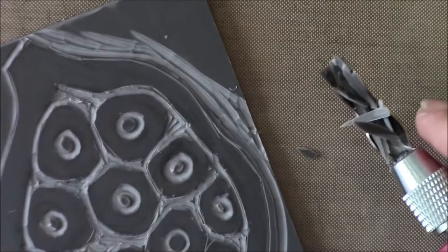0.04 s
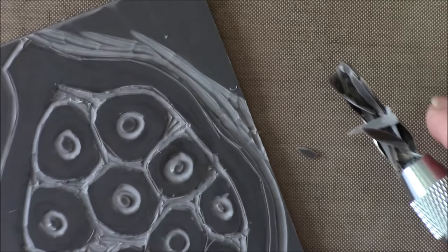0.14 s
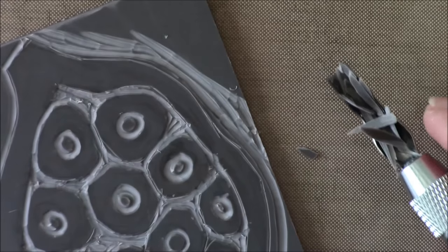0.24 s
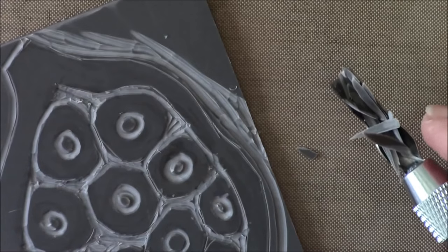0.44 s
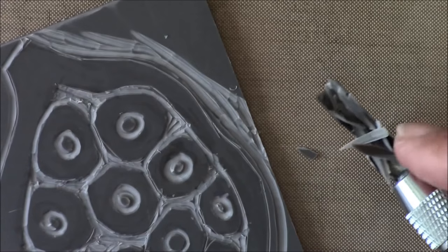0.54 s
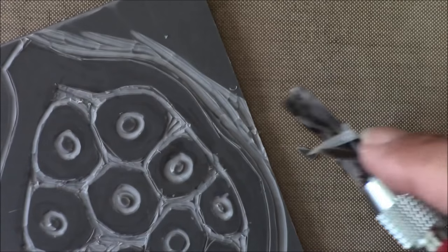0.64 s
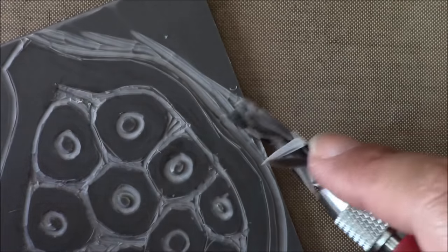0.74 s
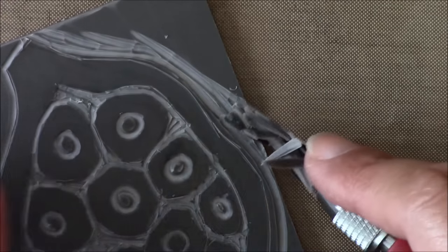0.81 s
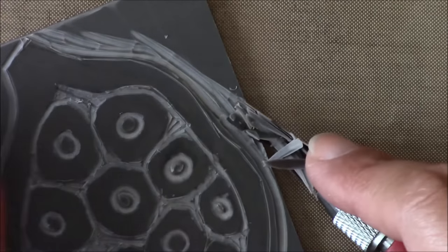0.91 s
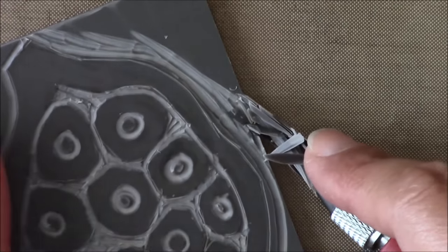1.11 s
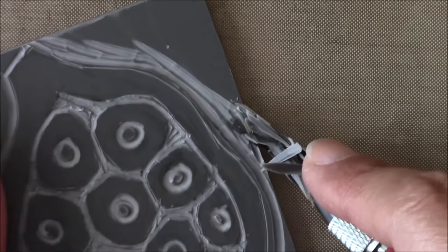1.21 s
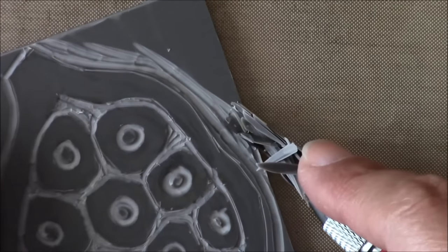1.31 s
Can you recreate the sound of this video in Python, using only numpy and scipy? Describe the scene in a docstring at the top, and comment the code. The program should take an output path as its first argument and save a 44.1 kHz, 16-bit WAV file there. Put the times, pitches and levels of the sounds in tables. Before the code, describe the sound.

A metal carving tool is handled close by in a small quiet room. It rubs and scrapes briefly, clicks sharply three times as it knocks on a block, then ticks and slides softly.

```python
"""A small quiet room, close by: a metal carving tool is turned in the fingers and set against a block.
It rubs and ticks lightly, scrapes once, then clicks sharply three times as it knocks on the block.
Small ticks and a soft slide follow, over faint room noise with a low hum.
Contacts are noise bursts plus damped modes of tool and block, each with a short room wash;
friction is grainy noise through resonances."""
import sys
import numpy as np
from scipy import signal
from scipy.fft import rfft, irfft, next_fast_len
from scipy.io import wavfile
from scipy.ndimage import map_coordinates

SR = 44100
rng = np.random.default_rng(int(sys.argv[2]) if len(sys.argv) > 2 else 0)


def wrap_up_sound(samples):
    """Save the sound to the file named by the first command line argument, as 16-bit audio."""
    columns = np.atleast_2d(samples).T
    # keep every value between -1 and 1, then stretch to whole-number steps
    tamed = np.clip(columns, -1, 1)
    steps = np.round(tamed * 32767).astype(np.int16)
    wavfile.write(sys.argv[1], SR, steps)


N = 59535

# stereo width of washes and rubbing: freq_hz, side_over_mid_db
ROOM_WIDTH = [(300, -28), (1000, -38), (2500, -44), (4500, -31), (8000, -15), (14000, -16.5)]


def amp(db):
    """Decibels to gain."""
    return 10 ** (np.asarray(db) / 20)


def unit(x):
    """Scale to rms 1."""
    return x / np.sqrt(np.mean(x ** 2) + 1e-20)


def along(points, hz):
    """Interpolate (freq_hz, value) points on a log axis."""
    freqs_hz, values = np.transpose(points)
    return np.interp(np.log(hz + 1), np.log(freqs_hz + 1), values)


def tilted(colour, db_per_oct):
    """Add a slope to a spectrum."""
    return [(hz, db + db_per_oct * np.log2(hz)) for hz, db in colour]


def filtered(x, response):
    """Zero-phase filter with gain response(hz)."""
    size = next_fast_len(N + 8192)
    return irfft(rfft(x, size) * response(np.fft.rfftfreq(size, 1 / SR)), size)[..., :N]


def highpass(x, cut_hz):
    """Second-order bass cut."""
    return signal.sosfilt(signal.butter(2, cut_hz, "highpass", fs=SR, output="sos"), x)


def noise(colour):
    """Coloured noise, rms 1."""
    return unit(filtered(rng.standard_normal(N), lambda hz: amp(along(colour, hz))))


def wide_noise(colour, width):
    """Coloured stereo noise from independent mid and side."""
    mid = noise(colour)
    side = filtered(noise(colour), lambda hz: amp(along(width, hz)))
    return np.array([mid + side, mid - side])


def resonant_noise(modes):
    """Noise through narrow resonances, rms 1."""
    body = lambda f: sum(amp(db) / (1 + ((f - hz) / width_hz) ** 2) for hz, width_hz, db in modes)
    return unit(filtered(rng.standard_normal(N), body))


def wobble(rate_hz):
    """Smooth random curve, rate_hz knots a second."""
    knots = rng.standard_normal(4096)
    return map_coordinates(knots, [np.arange(N) * rate_hz / SR], mode="wrap")


def since(start_s):
    """Seconds since start_s, zero before."""
    return np.maximum(np.arange(N) - round(start_s * SR), 0) / SR


def attack(t, rise_s):
    """Exponential rise to 1."""
    return 1 - np.exp(-t / rise_s)


def fade(t, t60_s):
    """Exponential decay, silent before its start."""
    return (t > 0) * amp(-60 * t / t60_s)


def ring(t, modes):
    """Damped modes struck at t = 0; the air follows their acceleration."""
    velocity = lambda hz, t60_s: fade(t, t60_s) * np.sin(2 * np.pi * hz * t)
    return sum(amp(db) * np.diff(velocity(hz, t60_s), prepend=0) / (2 * np.sin(np.pi * hz / SR))
               for hz, db, t60_s in modes)


def background():
    """Steady room noise, a wavering low hum, a thin band of hiss near 3 kHz and a faint thin band near 11 kHz."""
    air_colour = [(25, -18.5), (60, -17.5), (110, -12.5), (170, -6), (260, -1), (400, -0.5), (700, 1),
                  (1200, -3.5), (1800, -5), (2700, -9), (4000, -11.5), (6000, -15), (10000, -18),
                  (15500, -23)]  # freq_hz, density_db
    air_width = [(40, 5), (130, -8), (300, -9.5), (600, -7), (1500, -7), (4000, -5), (12000, -10)]  # freq_hz, side_over_mid_db
    hiss_bands = [(3140, 73, -75.5), (11160, 41, -86)]  # centre_hz, width_hz, level_db
    air_db, hum_db, hum_hz, waver_db = -66, -76, 241, 1.8
    hum_peak = np.sqrt(2) * amp(hum_db + waver_db * wobble(rate_hz=8))
    hum = hum_peak * np.sin(2 * np.pi * hum_hz * since(0))
    hiss = sum(amp(db) * resonant_noise([(hz, width_hz, 0)]) for hz, width_hz, db in hiss_bands)
    return amp(air_db) * wide_noise(air_colour, air_width) + hum + hiss


def room(t, db_per_oct=0):
    """Reflections of one contact: a grainy wash that dies faster after a short hold."""
    colour = [(120, -28), (300, -8.5), (700, -3.5), (1300, 2.5), (1800, 0), (2500, 5), (3300, 1), (5200, 4),
              (7400, -1), (10000, -4.5), (15000, -8.5)]  # freq_hz, gain_db
    delay_s, hold_s, late_t60_s, grain_db = 0.0013, 0.046, 0.25, 1
    t = np.maximum(t - delay_s, 0)
    wash = wide_noise(tilted(colour, db_per_oct), ROOM_WIDTH)
    grain = amp(grain_db * wobble(rate_hz=1100))  # single reflections stand out
    late_loss = amp(-60 * np.maximum(t - hold_s, 0) / late_t60_s)
    return unit(wash * grain) * attack(t, rise_s=0.00039) * fade(t, t60_s=0.27) * late_loss


def slide():
    """The tool drags unevenly on the block; the high resonances fade as it slows."""
    envelope = [(.74, -81), (.8, -72), (.845, -66.5), (.88, -71.5), (.94, -68), (1.0, -70), (1.045, -68),
                (1.09, -73), (1.14, -90)]  # time_s, level_db
    # low and high resonances: centre_hz, width_hz, gain_db
    body_modes = [(1160, 95, 3), (1420, 70, -9), (715, 97, -7)]
    edge_modes = [(3370, 170, -1), (4140, 220, -3)]
    edge_start_db, dulling_db_per_s, grain_db = 2.5, 40, 2
    level_db = np.interp(since(0), *np.transpose(envelope), left=-120, right=-120)
    edge_db = edge_start_db - dulling_db_per_s * since(envelope[0][0])
    grip = unit(amp(grain_db * wobble(rate_hz=130)))
    body = resonant_noise(body_modes)
    edge = amp(edge_db) * resonant_noise(edge_modes)
    return amp(level_db) * grip * (body + edge)


def rub():
    """Grainy friction of the turning tool through its resonances, swelling into a short scrape."""
    envelope = [(0, -61.5), (.03, -65.5), (.06, -60), (.085, -63), (.11, -76), (.17, -70), (.197, -78),
                (0.2, -66), (0.228, -60), (0.236, -44.5), (.25, -46.5), (.261, -53), (0.274, -50),
                (.292, -60.5), (.315, -63.5), (.34, -77), (0.412, -89), (.465, -56), (0.486, -48.5),
                (.52, -72)]  # time_s, level_db
    colour = [(1500, -35), (2700, -18), (3200, 0.5), (4500, 0.5), (5800, -1.5), (9000, 1.5), (10700, -0.5),
              (12500, 2.5), (14800, 2), (16000, 0)]  # freq_hz, gain_db
    tool_modes = [(3280, 160, 4.5), (5640, 146, 2), (6200, 230, 3.5), (7700, 270, 5), (8500, 170, 4),
                  (10530, 130, 9), (14750, 550, 4)]  # centre_hz, width_hz, boost_db
    grain_db = 1.5
    level_db = np.interp(since(0), *np.transpose(envelope), right=-120)
    friction = amp(grain_db * wobble(rate_hz=710)) * wide_noise(colour, ROOM_WIDTH)
    body = lambda f: amp(sum(db / (1 + ((f - hz) / width_hz) ** 2) for hz, width_hz, db in tool_modes))
    return amp(level_db) * unit(filtered(friction, body))


def ticks():
    """Light touches: one brief mode, a bright snap and a faint room wash."""
    # start_s, ring_db, pitch_hz, ring_t60_s, snap_db, snap_t60_s, room_db
    touches = [(0.1275, -52, 14100, .005, -54, 0.01, -78), (0.1337, -44.5, 3100, 0.0023, -54, .003, -72),
               (0.1568, -45, 8600, 0.0014, -34, 0.0036, -74), (0.1589, -59, 6100, .002, -52, 0.014, -78),
               (0.211, -50, 13800, .006, -59, .008, -90), (0.2354, -39.5, 5920, 0.015, -41, 0.012, -65.5),
               (0.243, -32, 14600, 0.0052, -42.5, 0.012, -71), (0.2535, -36, 14700, .012, -48, .008, -72),
               (0.303, -60, 5600, 0.075, -66, .01, -76), (0.513, -67, 5150, .006, -53, 0.013, -56),
               (0.5641, -50, 11700, .006, -38.5, .02, -54), (0.566, -37.5, 2540, 0.014, -44, 0.015, -58.5),
               (0.5770, -33, 4800, 0.0079, -48, .005, -61), (0.5835, -42, 10900, 0.0046, -43, 0.0091, -71),
               (0.646, -37.5, 5640, 0.002, -48.5, 0.015, -61.5),
               (0.6861, -39, 4110, 0.0056, -55, .012, -78), (0.6862, -46.5, 1170, 0.018, -70, .014, -73),
               (0.706, -44, 4500, 0.0033, -60, .014, -63.5), (0.771, -55, 12900, .004, -62, .014, -68),
               (1.004, -58.5, 4050, .007, -74, .006, -82)]
    snap_colour = [(1000, -35), (2400, -35), (3300, -9), (6000, 6.5), (9000, 0.5), (14000, 3), (16000, 1.5)]  # freq_hz, gain_db
    out = np.zeros((2, N))
    for start_s, ring_db, pitch_hz, ring_t60_s, snap_db, snap_t60_s, room_db in touches:
        t = since(start_s)
        snap = amp(snap_db) * noise(snap_colour) * fade(t, snap_t60_s)
        out += ring(t, [(pitch_hz, ring_db, ring_t60_s)]) + snap + amp(room_db) * room(t)
    return out


def knocks():
    """The block knocks on the cloth-covered table: hollow modes and a lingering wash."""
    impacts = [(0.4640, -43, .95), (0.5385, -53, 1.03), (0.585, -54, .64)]  # start_s, level_db, pitch_ratio
    block_modes = [(434, -3, 0.087), (515, -6, 0.075), (680, -2.5, 0.071), (1054, -4, 0.042),
                   (2368, -10, 0.19)]  # base_hz, gain_db, base_t60_s
    wash_colour = [(250, -25), (420, -11.5), (700, 1), (1000, -4), (2500, -18)]  # freq_hz, gain_db
    wash_db = -6.5
    out = np.zeros((2, N))
    for start_s, level_db, pitch_ratio in impacts:
        t = since(start_s)
        wash = amp(wash_db) * wide_noise(wash_colour, ROOM_WIDTH) * fade(t, t60_s=0.2)
        out += amp(level_db) * (ring(t * pitch_ratio, block_modes) + wash) * attack(t, rise_s=0.00058)
    return out


def clicks():
    """Hard contacts crack, snap, ring and rattle the tool; the last two merge into one click."""
    # start_s, crack_db, crack_t60_s, low_db, high_db, rattle_db, room_db, db_per_oct, cut_hz, snap_db
    contacts = [(0.4187, -34, 0.058, -41, -38, -35, -43, -0.5, 526, -45),
                (0.4630, -33, 0.022, -45, -27, -68, -48, 2, 90, -38),
                (0.5355, -25.5, 0.0082, -19, -19.5, -46, -40, 1.7, 120, -25),
                (0.5399, -46, 0.0093, -23, -37, -43, -44, -1.5, 122, -35)]
    # two mode groups of the tool, and its loose parts: pitch_hz, gain_db, t60_s
    low_modes = [(3490, -14.5, 0.0066), (4559, -26, 0.1), (4772, -15, 0.045), (5031, -14, 0.036),
                 (5272, -19.5, 0.095), (5280, 10, 0.0041), (5448, -19, 0.07), (5588, -23, .05),
                 (5948, -22, .05)]
    high_modes = [(6750, -16, 0.022), (6980, -14.5, 0.058), (7120, -25, 0.027), (7200, -20, 0.045),
                  (7500, -20, 0.015), (7280, 15, 0.0032), (7800, -16, .02), (8470, -22, 0.07)]
    rattle_modes = [(1404, 4.5, 0.0092), (2470, -1, 0.025), (3490, 4, .02), (3890, -14, 0.013),
                    (5150, 0.5, .02), (5910, -1.5, 0.025), (7100, 5, 0.012), (7630, 2.5, 0.021),
                    (14160, -2, 0.019)]
    # spectra of the contact noise and its first instant: freq_hz, gain_db
    crack_colour = [(120, -27), (400, -13), (900, -10.5), (1340, -9.5), (2000, -10.5), (3500, -8),
                    (4200, -1), (5200, -5), (7600, -5.5), (9000, -8), (11500, -9), (15500, -7)]
    snap_colour = [(3000, -19), (7000, -9), (10500, 1), (16000, -4)]
    out = np.zeros((2, N))
    for (start_s, crack_db, crack_t60_s, low_db, high_db,
         rattle_db, room_db, db_per_oct, cut_hz, snap_db) in contacts:
        t = since(start_s)
        crack = amp(crack_db) * noise(tilted(crack_colour, db_per_oct)) * fade(t, crack_t60_s)
        wash = amp(room_db) * room(t, db_per_oct)
        snap = amp(snap_db) * noise(snap_colour) * fade(t, t60_s=0.0056)
        metal = amp(low_db) * ring(t, low_modes) + amp(high_db) * ring(t, high_modes)
        metal *= attack(t, rise_s=0.00061)
        rattle = amp(rattle_db) * ring(t, rattle_modes) * attack(t, rise_s=0.0005)
        out += highpass(crack + wash + snap + metal + rattle, cut_hz)
    return out


def scene():
    """Handling sounds, treble slightly to the left, over the background."""
    balance = [(300, -1.5), (7000, 0), (14500, 2)]  # freq_hz, left_over_right_db
    pan = lambda hz: amp(np.outer([.5, -.5], along(balance, hz)))
    handling = clicks() + knocks() + ticks() + rub() + slide()
    handling = highpass(handling, cut_hz=260)  # small objects radiate little bass
    return filtered(handling, pan) + background()


def record(dry):
    """Steep low-pass at the top of the treble."""
    top_hz = 15800
    return filtered(dry, lambda hz: 1 / np.sqrt(1 + (hz / top_hz) ** 300))


dry = scene()
out = record(dry)
wrap_up_sound(out)
```